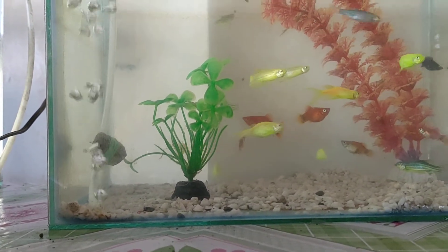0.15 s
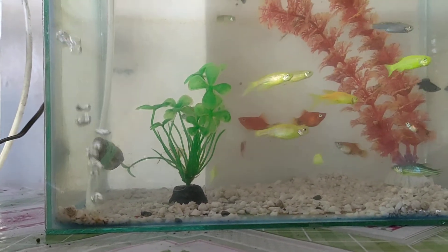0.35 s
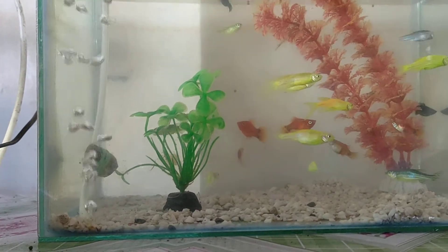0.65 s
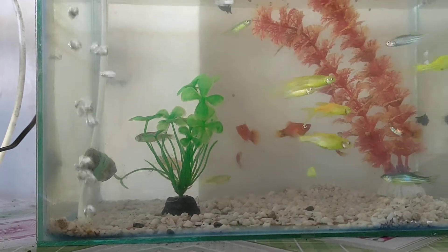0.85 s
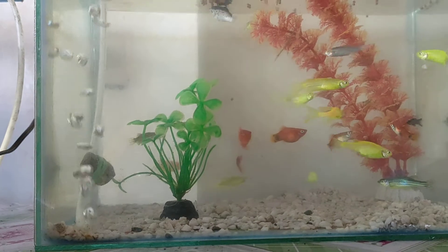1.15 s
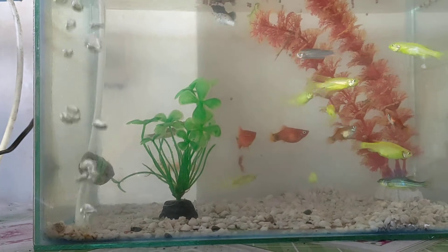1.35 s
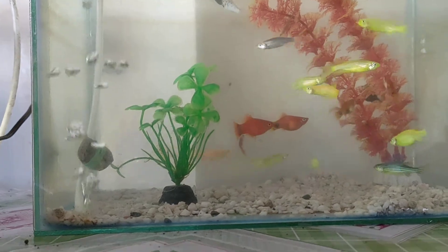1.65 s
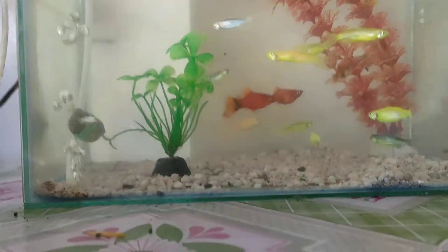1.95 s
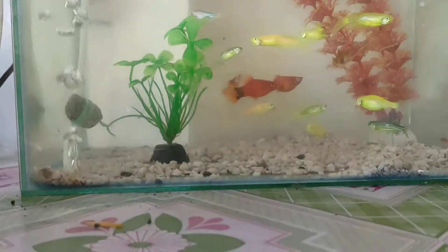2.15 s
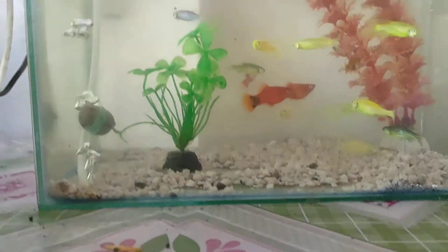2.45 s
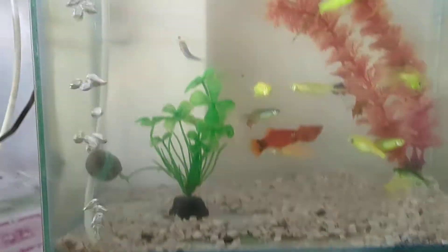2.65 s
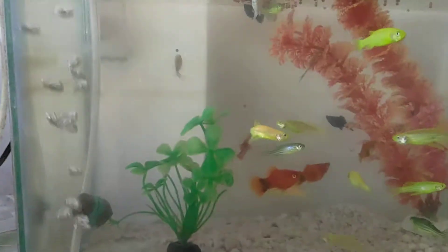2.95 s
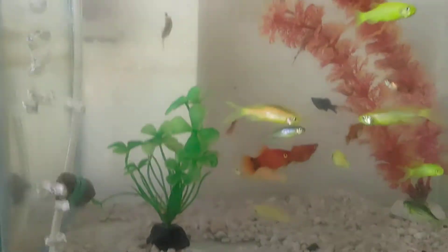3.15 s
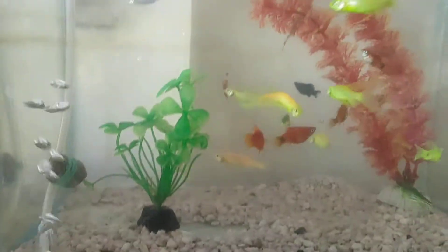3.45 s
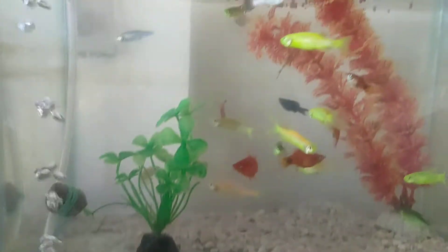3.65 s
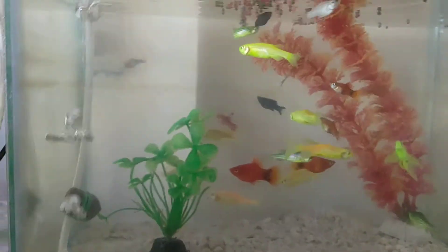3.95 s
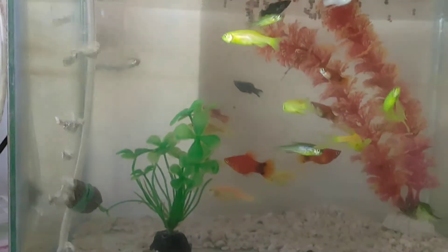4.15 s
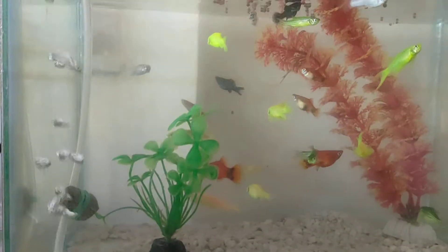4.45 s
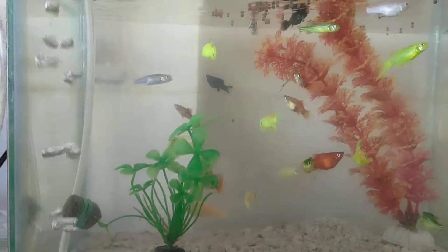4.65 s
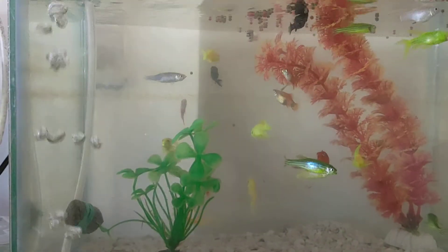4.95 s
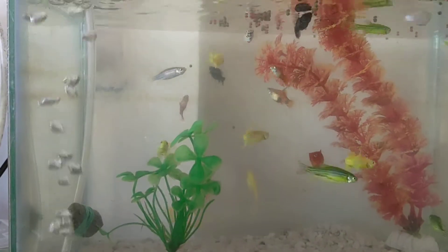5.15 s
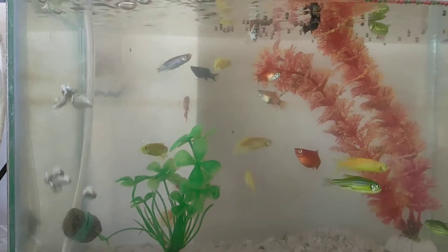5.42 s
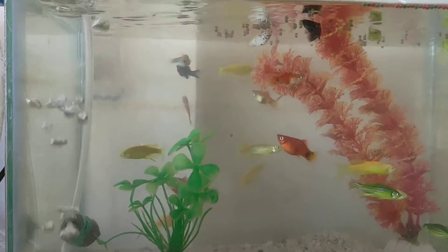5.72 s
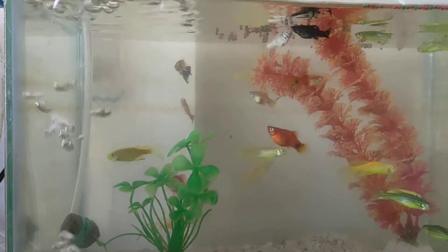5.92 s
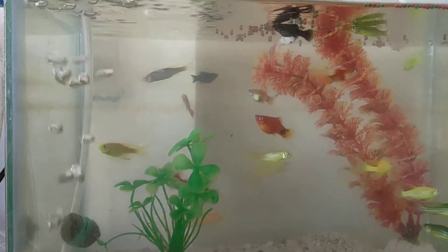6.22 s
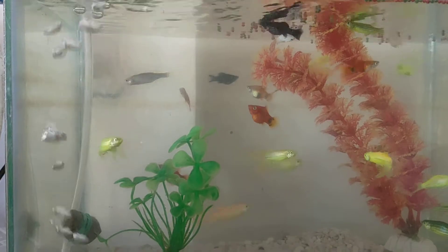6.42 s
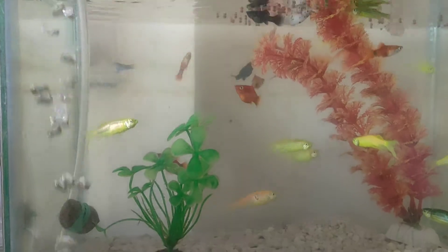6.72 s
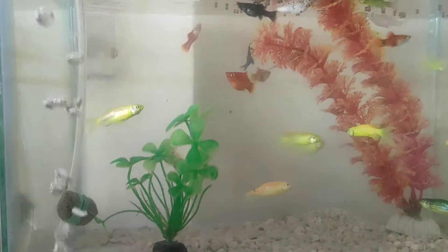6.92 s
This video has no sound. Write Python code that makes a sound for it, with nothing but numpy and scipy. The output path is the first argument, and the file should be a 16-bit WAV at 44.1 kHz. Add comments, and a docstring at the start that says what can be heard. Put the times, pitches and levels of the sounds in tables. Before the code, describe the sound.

An aquarium air pump buzzes and rattles steadily in a quiet room, with faint bubbling water and a few sharp taps on the microphone early on.

```python
"""In a quiet room, beside a small fish tank, a diaphragm air pump buzzes at mains rate.
Steady tones make its hum; every stroke knocks its housing, whose ringing resonances make the rattle.
The air it drives gurgles up and pops at the surface: short tones that rise in pitch as they die.
Soft filtered noise and a low drone fill the room. A hand-held microphone drifts along the glass;
fingers rub and tap its body, and the hardest tap makes a limiter duck the sound."""
import sys
import numpy as np
from scipy import signal
from scipy.fft import rfft, irfft
from scipy.io import wavfile
from scipy.ndimage import uniform_filter1d, minimum_filter1d

SR = 44100
rng = np.random.default_rng(int(sys.argv[2]) if len(sys.argv) > 2 else 0)


def pcm_store(signal):
    """Save signal as 16-bit PCM."""
    levels = np.round(np.clip(np.atleast_2d(signal), -1, 1) * 32767)
    wavfile.write(sys.argv[1], SR, levels.astype(np.int16).T)


N = 312228
TIME = np.arange(N) / SR
STROKE_HZ = 59.8956


def from_db(db):
    """Turn decibels into a gain."""
    return 10 ** (np.asarray(db) / 20)


def rms_one(x):
    """Scale a sound to unit power."""
    return x / np.sqrt(np.mean(x ** 2) + 1e-20)


def steady(x):
    """Hold the mean power of the two channels at 1 over a dozen strokes."""
    power = uniform_filter1d(np.mean(x ** 2, axis=0), size=SR // 5)
    return x / np.sqrt(power + 1e-20)


def in_time(rows):
    """Read each column of a curve at every sample; the first column is the time in seconds."""
    s, *columns = np.transpose(rows)
    return [np.interp(TIME, s, column) for column in columns]


def at_hz(points, hz):
    """Read a spectrum on a log-frequency axis."""
    point_hz, values = np.transpose(points)
    return np.interp(np.log(hz), np.log(point_hz), values)


def panned(left_minus_right_db):
    """Left and right gains for a level difference."""
    return from_db(np.array([[.5], [-.5]]) * left_minus_right_db)


def drift(rate):
    """A slow random wander: straight lines between random values of spread 1, drawn `rate` times a second."""
    knots = rng.standard_normal(1024)
    return np.interp(TIME * rate, np.arange(len(knots)), knots)


def clicks(times, sizes):
    """Single-sample impulses at the given moments."""
    at = np.round(np.asarray(times) * SR).astype(int)
    inside = (at >= 0) & (at < N)
    return np.bincount(at[inside], np.asarray(sizes)[inside], N) + 1e-18


def resonate(x, hz, width_hz):
    """A resonance applied twice: gain 1 at its peak, steep skirts."""
    r = np.exp(-np.pi * width_hz / SR)
    b = (1 - r * r) / 2
    section = [b, 0, -b, 1, -2 * r * np.cos(2 * np.pi * hz / SR), r * r]
    return signal.sosfilt([section] * 2, x)


# Path of the microphone along the glass:
# time_s, place (0 first, 1 second, 2 third), hum_level_db, echo_db (added to the echo of the rattle)
MICROPHONE_PATH = [(0, 0.34, -20, 10.5), (1.9, 0.22, -20.5, 8.5), (2.35, 0.38, -21, 6.5),
                   (2.65, 0.59, -21.6, 6), (2.95, 0.85, -21.5, 10.5), (3.5, 0.98, -21.5, 7.5),
                   (3.9, 1.19, -21.5, 1.5), (4.5, 1.66, -21.5, 5), (7.08, 1.83, -21.5, 2.5)]


def here(by_place):
    """Blend values given for the three places as the microphone moves."""
    place = in_time(MICROPHONE_PATH)[0]
    return np.interp(place, np.arange(3), by_place)


ROOM_T60_S = 0.14  # time for the echo to fall by 60 dB
TURN_MS, TURN_PER_S = 0.039, 1.603  # the hand turns the pair of ports a little


def room(x, wet_db, lead_ms=0.4544):
    """Direct sound reaches the left port first, by a lead that wanders as the hand turns;
    dense reflections differ at each port and place."""
    t = TIME[:SR // 5]
    fading = from_db(-60 * t / ROOM_T60_S) * (t > .002)  # reflections start after 2 ms
    tails = rng.standard_normal((3, 2, len(t))) * fading
    tails = tails / np.sqrt(np.sum(tails ** 2, axis=2, keepdims=True))
    echo = np.zeros((2, N))
    for place, tail in zip(np.eye(3), tails):
        reflected = signal.oaconvolve(x[None], tail, axes=1)[:, :N]
        echo += np.sqrt(here(place)) * reflected
    delay_s = (lead_ms + TURN_MS * drift(TURN_PER_S)) / 1000
    right = np.interp(TIME - delay_s, TIME, x)
    return np.array([x, right]) + from_db(wet_db) * echo


# Spectrum of the room's air: pitch_hz, relative_level_db (per Hz)
AIR_SPECTRUM = [(20, -8), (45, -12), (90, -4.5), (200, -5.5), (330, -0.5), (520, 3), (680, -4), (900, -4),
                (1120, -17), (1500, -22), (4000, -37), (8000, -65), (15000, -67)]
# How alike the air noise is at left and right: pitch_hz, likeness (0 unrelated, 1 the same)
AIR_LIKENESS = [(30, 1), (120, 0.66), (300, 0), (900, 0), (2500, 0), (12000, 0)]
AIR_DB, DRONE_HZ, DRONE_DB = -36, 57, -46.5


def air():
    """Soft room noise, shaped by pitch, and a low drone whose phase wavers."""
    hz = np.maximum(np.arange(N // 2 + 1) * SR / N, 1)
    mid, side = rfft(rng.standard_normal((2, N))) * from_db(at_hz(AIR_SPECTRUM, hz))
    alike = np.clip(at_hz(AIR_LIKENESS, hz), -1, 1)
    left_right = np.sqrt(1 + alike) * mid + np.sqrt(1 - alike) * side * [[1], [-1]]
    noise = irfft(left_right, N)
    drone = rms_one(np.sin(2 * np.pi * DRONE_HZ * TIME + 0.43 * drift(3.5)))
    return from_db(AIR_DB) * rms_one(noise) + from_db(DRONE_DB) * drone


# The grip shifts and rubs: middle_s, half_length_s, level_db
GRIP_RUBS = [(1.955, 0.18, -38.5), (2.8, 0.34, -41)]
RUB_HZ, RUB_WIDTH_HZ = 220, 240


def rubs():
    """Fingers shifting on the microphone's body make a soft, low rumble: noise through a resonance."""
    pressure = np.zeros(N)
    for s, half_s, db in GRIP_RUBS:
        pressure += from_db(db) * np.exp(-((TIME - s) / half_s) ** 2)
    return pressure * rms_one(resonate(rng.standard_normal((2, N)), RUB_HZ, RUB_WIDTH_HZ))


# Taps on the microphone's body, one row for each resonance struck:
# start_s, peak_db (at the left port), pitch_hz, width_hz
BODY_TAPS = [(0.2329, 5, 1850, 1700), (0.2329, -8, 1250, 700), (0.4033, -1, 4200, 2300),
             (0.4032, -7, 2200, 1400), (.8553, -14, 1170, 383), (0.855, -7, 2600, 3000),
             (1.6833, -4, 3000, 3600)]


def taps(far_port_db=-21, soft_hz=7200):
    """Dry clicks through the body, right next to the left port; the fingertip softens their top."""
    out = np.zeros(N)
    fingertip = signal.butter(4, soft_hz, fs=SR, output="sos")
    for s, db, hz, width_hz in BODY_TAPS:
        force = signal.sosfilt(fingertip, clicks([s], [1]))
        ring = resonate(force, hz, width_hz)
        out += from_db(db) * ring / np.abs(ring).max()
    return out * from_db([[0], [far_port_db]])


def bubbles(rows, cycles, rise):
    """Each bubble rings for some cycles, fading by 60 dB, and rises in pitch as it dies."""
    out = np.zeros(N)
    for s, db, hz in rows:
        start = int(s * SR)
        length = min(int(cycles / hz * SR), N - start)
        turns = TIME[:length] * hz
        age = turns / cycles  # 0 at birth, 1 at the end
        ring = np.sin(2 * np.pi * turns * (1 + rise * age))
        out[start:start + len(age)] += from_db(db - 60 * age) * ring
    return out


def swarm(count, level_db, spread_db, low_hz, high_hz):
    """Bubbles of random moment, strength and size; rows of start_s, level_db, pitch_hz."""
    when, strength, size = rng.random((count, 3)).T
    start_s = when * TIME[-1]
    pitch_hz = low_hz * (high_hz / low_hz) ** size
    return np.transpose([start_s, level_db - spread_db * strength, pitch_hz])


# Larger bubbles popping: start_s, level_db (before the echo), pitch_hz
LARGE_POPS = [(2.4415, -20, 3850), (5.889, -27, 3700)]


def water():
    """Big bubbles gurgle softly off the tube; small ones pop at the surface."""
    big = swarm(count=600, level_db=-36, spread_db=12, low_hz=280, high_hz=850)
    small = swarm(count=200, level_db=-26, spread_db=16, low_hz=2800, high_hz=5200)
    gurgle = bubbles(big, cycles=20, rise=.08)
    fizz = bubbles(small, cycles=11, rise=.06)
    pops = bubbles(LARGE_POPS, cycles=3.9, rise=0.045)
    return room(gurgle + fizz + pops, wet_db=-4)


# Tones of the hum at three places along the tank: multiple (of the stroke rate), relative_level_db
HUM_FIRST_PLACE = [(1, -45), (2, -18), (3, -18.5), (4, -22), (5, -22.5), (6, -10), (7, -12), (8, -2),
                   (9, 0), (10, -26.5), (11, -29), (12, -19), (13, -54), (14, -20), (15, -52), (16, -32),
                   (17, -75), (18, -88)]
HUM_SECOND_PLACE = [(1, -28), (2, -8), (3, -14.5), (4, -15.5), (5, -20), (6, -9), (7, -11.5), (8, 3),
                    (9, 2.5), (10, -4), (11, -10.5), (12, -87), (13, -88), (14, -16), (15, -17), (16, -12),
                    (17, -25.5), (18, -34)]
HUM_THIRD_PLACE = [(1, -48), (2, -16), (3, -18), (4, -21.5), (5, -20.5), (6, -9), (7, -12.5), (8, -0.5),
                   (9, 1), (10, -17), (11, -25), (12, -17), (13, -48), (14, -27), (15, -38), (16, -19),
                   (17, -36), (18, -65)]
# Which side the hum leans to: pitch_hz, left_minus_right_db
HUM_LEFT_RIGHT = [(120, 1), (180, -7), (290, 3), (420, -1), (480, 1), (540, -2), (690, -4), (830, 8),
                  (960, -5)]


def hum(body_hz=508, body_width_hz=130, back_ms=5.85, back_share=1.0, lead_ms=0.25, waver_db=0.21):
    """Forward and return strokes and the ringing housing set the phase of each tone;
    standing waves recolour the hum from place to place."""
    tables = np.array([HUM_FIRST_PLACE, HUM_SECOND_PLACE, HUM_THIRD_PLACE])
    arrival = TIME - np.array([[-.5], [.5]]) * lead_ms / 1000  # the left port leads
    out = np.zeros((2, N))
    for k, multiple in enumerate(tables[0, :, 0]):
        hz = round(multiple) * STROKE_HZ
        strokes = 1 + back_share * np.exp(2j * np.pi * hz * back_ms / 1000)
        body = 1 / (1 + 1j * (hz ** 2 - body_hz ** 2) / (hz * body_width_hz))
        phase = np.angle(strokes * body ** 2)
        gain = from_db(here(tables[:, k, 1]) + waver_db * drift(6.8))
        tone = np.cos(2 * np.pi * hz * arrival + phase)
        out += gain * panned(at_hz(HUM_LEFT_RIGHT, hz)) * tone
    return from_db(in_time(MICROPHONE_PATH)[1]) * steady(out)


# Standing waves by the glass that the microphone passes through:
# middle_s, half_crossing_s, pitch_hz, width_hz, left_db, right_db
GLASS_WAVES = [(0.14, 0.52, 2220, 600, -1, -8), (1.45, 0.16, 2240, 500, 2, -2),
               (2.12, 0.65, 5540, 1400, 2.5, 3), (2.7, 0.21, 2370, 800, -4, 8.5),
               (2.92, 0.17, 6840, 600, 8.5, 1), (3.35, 0.48, 6540, 1200, -3, 4.5),
               (3.8, 0.34, 4200, 1310, 5.5, 3), (3.9, 0.17, 2190, 500, -4, -2),
               (4.03, 0.32, 6370, 1080, 6, -8), (4.8, 0.17, 6050, 1500, 1.5, -4),
               (5.1, .14, 6300, 2000, -0.5, 3)]


def standing_waves(x):
    """Each standing wave raises or sinks one band at each port while the microphone crosses it."""
    for s, half_s, hz, width_hz, left_db, right_db in GLASS_WAVES:
        nearness = np.exp(-((TIME - s) / half_s) ** 2)
        band = signal.lfilter(*signal.iirpeak(hz, hz / width_hz, fs=SR), x)
        change = from_db(nearness * np.array([[left_db], [right_db]])) - 1
        x = x + change * band
    return x


# Strokes on which the housing lands hard: time_s, extra_db
HARD_LANDINGS = [(2.019, 8), (2.035, 8), (2.135, 5), (2.236, 5), (3.505, 5), (3.538, 4), (3.672, 5),
                 (3.722, 6), (3.839, 5), (3.922, 4), (3.956, 5), (4.356, 5), (4.857, 5), (5.109, 6),
                 (5.325, 4), (5.459, 4), (6.144, 5), (6.394, 5)]
STROKE_UNEVEN_DB = 1.67  # random scatter of the strokes' force


def stroke_force(count):
    """Strokes differ at random, and now and then the housing jumps and lands hard: dB for each stroke."""
    force_db = STROKE_UNEVEN_DB * rng.standard_normal(count)
    for s, db in HARD_LANDINGS:
        force_db[round(s * STROKE_HZ)] += db
    return force_db[:, None]


# Contacts within one stroke: offset_ms, timing_scatter_ms (before looseness), then relative levels:
# burr_and_thrum_db, clack_db, sizzle_db, rasp_db
STROKE_CONTACTS = [(-6.52, .04, -6, -13, -15, -10), (-4.63, .028, 3, -6, -24, -9),
                   (-2.49, .035, -5, -14, -23, -16), (-.58, .02, -13, 2, 0, 1),
                   (.84, .035, -17, -10, -9, -6), (2.11, .05, -18, -18, -12, -11)]
# How loosely the housing chatters: time_s, looseness_db (growth of timing scatter and scuffing)
HOUSING_LOOSENESS = [(0, 1), (1.7, 0.5), (2.05, 3), (2.7, 1), (2.95, -2.5), (3.6, -4), (4.0, 2),
                     (7.08, -0.5)]


def contact_times():
    """The housing touches down several times a stroke; the looser it sits, the less exactly."""
    ms, scatter_ms = np.array(STROKE_CONTACTS).T[:2]
    strokes = np.arange(int(N / SR * STROKE_HZ) + 2)[:, None] / STROKE_HZ
    loose = from_db(np.interp(strokes, *np.transpose(HOUSING_LOOSENESS)))
    jitter_ms = loose * scatter_ms * rng.standard_normal((len(strokes), len(ms)))
    return strokes + (ms + jitter_ms) / 1000


SCUFF_RISE_S = .0012  # length of the smoothing that makes a scuff swell


def rattle(times, contact_db, modes, heard, uneven_db, scuff_db, scuff_s, wet_db, lead_ms=0.4565):
    """Each contact is a knock and a brief scuff that swells around it, ringing a group of resonances;
    the place sets how they are heard."""
    knock_db = contact_db + uneven_db * rng.standard_normal(times.shape)
    knocks = clicks(times.ravel(), from_db(knock_db).ravel())
    r = np.exp(-1 / (scuff_s * SR))
    fading = signal.lfilter([np.sqrt(1 - r * r)], [1, -r], knocks)
    pressure = uniform_filter1d(fading, size=int(SCUFF_RISE_S * SR))
    scuff_gain = from_db(scuff_db + in_time(HOUSING_LOOSENESS)[0])
    force = knocks + scuff_gain * pressure * rng.standard_normal(N)
    rings = np.zeros(N)
    for k, (hz, width_hz, *db) in enumerate(modes):
        rings += (-1) ** k * from_db(here(db)) * resonate(force, hz, width_hz)  # signs alternate
    level_db, pan_db = map(here, heard)
    echoed = room(rings, wet_db + in_time(MICROPHONE_PATH)[2], lead_ms)
    return from_db(level_db) * panned(pan_db) * steady(echoed)


# Resonances of the rattling housing, one table for each part of the rattle:
# pitch_hz, width_hz, first_place_db, second_place_db, third_place_db (relative levels)
BURR_MODES = [(1066, 480, -2.5, -5, -1), (1334, 31, 13.5, 5, 5), (1403, 1060, -12, -5, -10)]
THRUM_MODES = [(1718, 330, -3, -10, -5), (1885, 208, -8, -4, -4)]
CLACK_MODES = [(2156, 419, -1, -1, 1), (2357, 712, -15, -7, -3), (2230, 215, -11, -3, -5)]
CHATTER_MODES = [(2780, 400, 0, 0, 0)]
SIZZLE_MODES = [(5455, 590, -4, -7.5, -13), (5911, 476, -0.5, -2, 1.5), (5720, 110, -14, -22, 15),
                (6280, 200, -18.5, -15, -2)]
RASP_MODES = [(3000, 1040, -2, 0.5, 0.5), (4176, 1300, 1.5, 1, -0.5), (6760, 1530, -2.5, -2, -7.5),
              (9810, 1230, -13, -13, -19.5), (11800, 5500, -24.5, -18, -28.5)]
# How each part is heard at the three places, two rows: level_db (before panning), left_minus_right_db
BURR_AT_PLACES = (-39, -36.5, -43.5), (3, 2.5, 0.5)
THRUM_AT_PLACES = (-34, -38.5, -34.5), (8.5, -8.5, -0.5)
CHATTER_AT_PLACES = (-54, -46.5, -39), (-3, -2, -7)
CLACK_AT_PLACES = (-33.5, -30.5, -29.5), (10, -0.5, -1.5)
SIZZLE_AT_PLACES = (-31.5, -34, -29), (5, 6, 6)
RASP_AT_PLACES = (-38.5, -39, -38.5), (1, 1, -2)
# How much sooner the thrum reaches the left port: first_place_ms, second_place_ms, third_place_ms
THRUM_LEADS = (.456, 0.43, 0.3)
CHATTER_LEAD_MS = .36
SIZZLE_FOLLOWS = 0.37  # share of the stroke force, in dB, that reaches the sizzle


def pump_rattle():
    """The return stroke burrs and thrums low, then the forward stroke gives a higher clack, a thin chatter,
    a dry rasp and a bright sizzle; hard strokes are brighter."""
    thrum_hits, clack_hits, sizzle_hits, rasp_hits = np.array(STROKE_CONTACTS).T[2:]
    times = contact_times()
    hard_db = stroke_force(len(times))
    burr = rattle(times, thrum_hits, BURR_MODES, BURR_AT_PLACES,
                  uneven_db=1.2, scuff_db=-7, scuff_s=0.003, wet_db=-16)
    thrum = rattle(times, thrum_hits, THRUM_MODES, THRUM_AT_PLACES,
                   uneven_db=1.1, scuff_db=-8, scuff_s=0.0025, wet_db=-12, lead_ms=here(THRUM_LEADS))
    clack = rattle(times, clack_hits, CLACK_MODES, CLACK_AT_PLACES,
                   uneven_db=0.8, scuff_db=-9.5, scuff_s=0.0025, wet_db=-11)
    chatter = rattle(times, clack_hits + hard_db, CHATTER_MODES, CHATTER_AT_PLACES,
                     uneven_db=1.5, scuff_db=-4, scuff_s=0.0025, wet_db=-10, lead_ms=CHATTER_LEAD_MS)
    sizzle = rattle(times, sizzle_hits + SIZZLE_FOLLOWS * hard_db, SIZZLE_MODES, SIZZLE_AT_PLACES,
                    uneven_db=1.2, scuff_db=-8, scuff_s=0.0011, wet_db=-9.5)
    rasp = rattle(times, rasp_hits + hard_db, RASP_MODES, RASP_AT_PLACES,
                  uneven_db=2, scuff_db=-5, scuff_s=0.0021, wet_db=-2)
    return standing_waves(burr + thrum + clack + chatter + sizzle + rasp)


def scene():
    """Room, the hand on the microphone, water and pump."""
    return air() + rubs() + taps() + water() + hum() + pump_rattle()


CUTOFF_HZ = 15600


def record(dry, ceiling_db=-1.0, release_db_per_s=22):
    """A look-ahead limiter ducks on peaks and recovers slowly; the top is cut."""
    peak_db = 20 * np.log10(np.abs(dry).max(axis=0) + 1e-9)
    over_db = np.maximum(peak_db - ceiling_db, 0)
    released_db = release_db_per_s * TIME
    held_db = np.maximum.accumulate(over_db + released_db) - released_db
    gain_db = uniform_filter1d(minimum_filter1d(-held_db, size=129), size=129)
    top_cut = signal.ellip(10, .1, 90, CUTOFF_HZ, fs=SR, output="sos")
    return signal.sosfilt(top_cut, dry * from_db(gain_db))


dry = scene()
out = record(dry)
pcm_store(out)
```